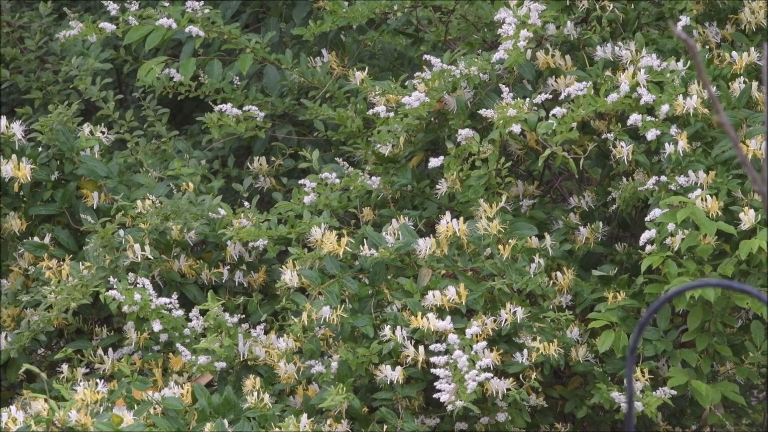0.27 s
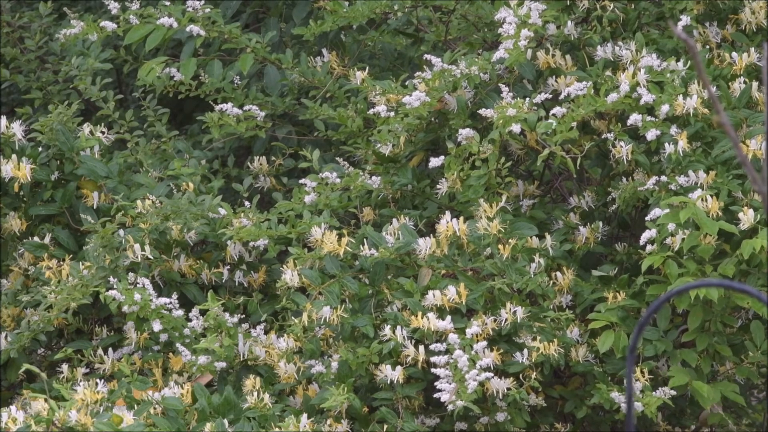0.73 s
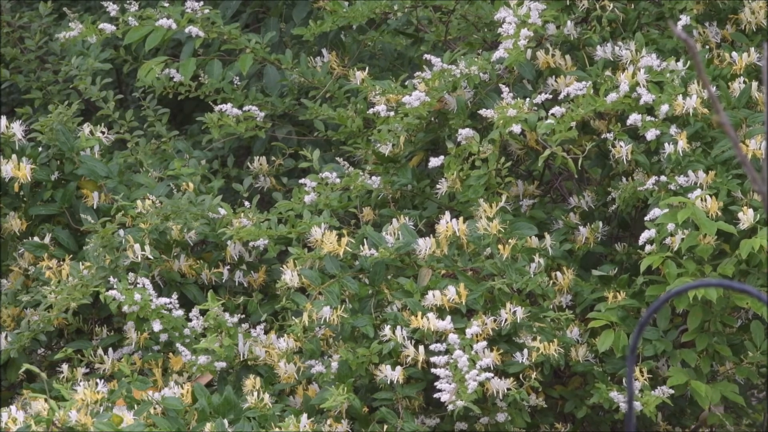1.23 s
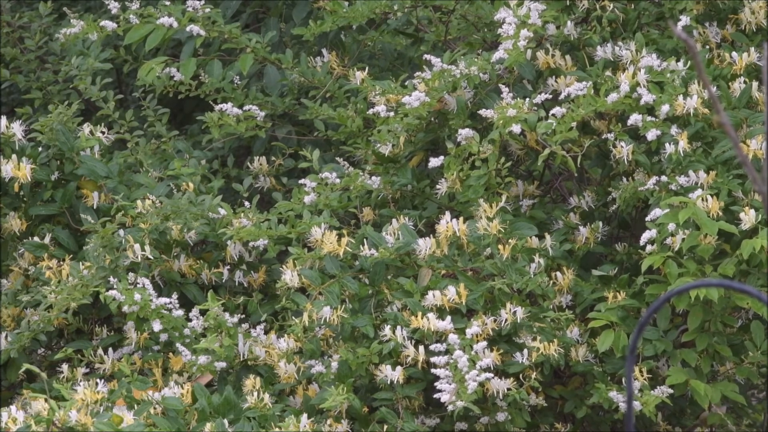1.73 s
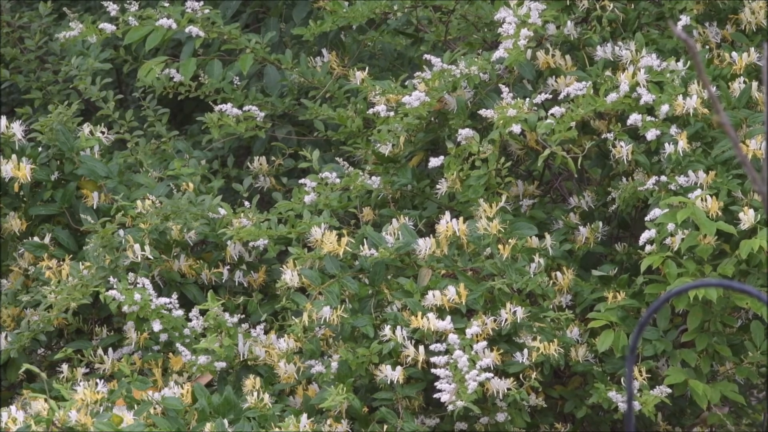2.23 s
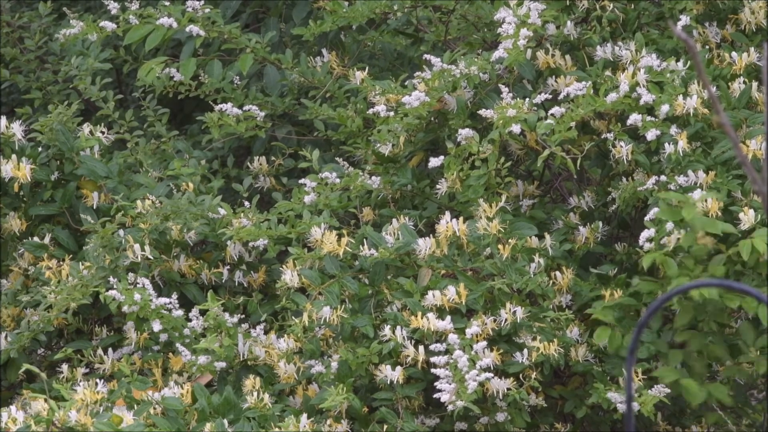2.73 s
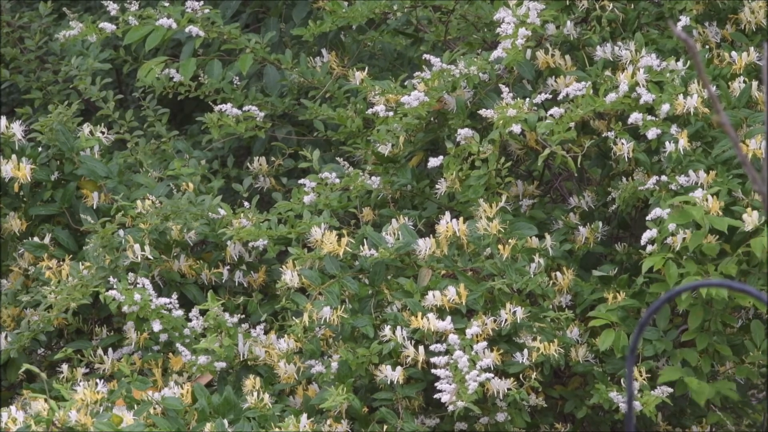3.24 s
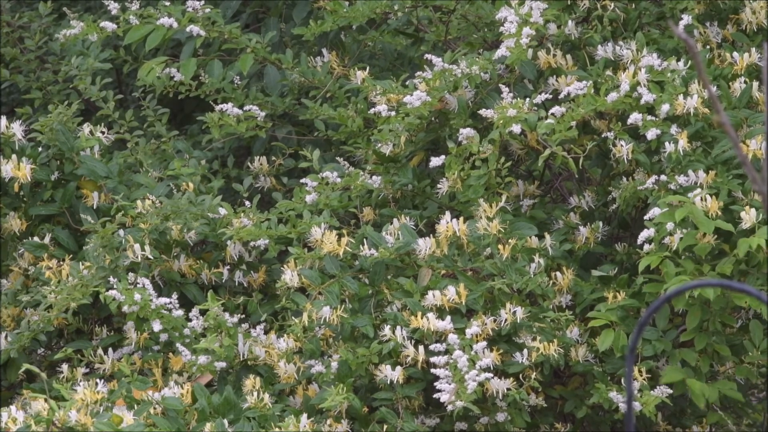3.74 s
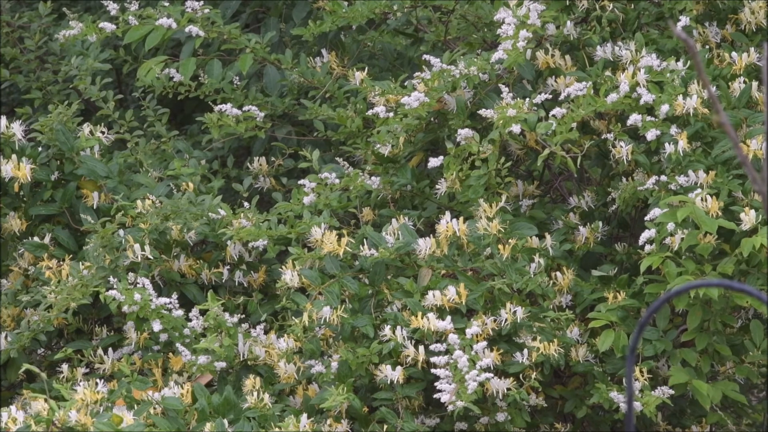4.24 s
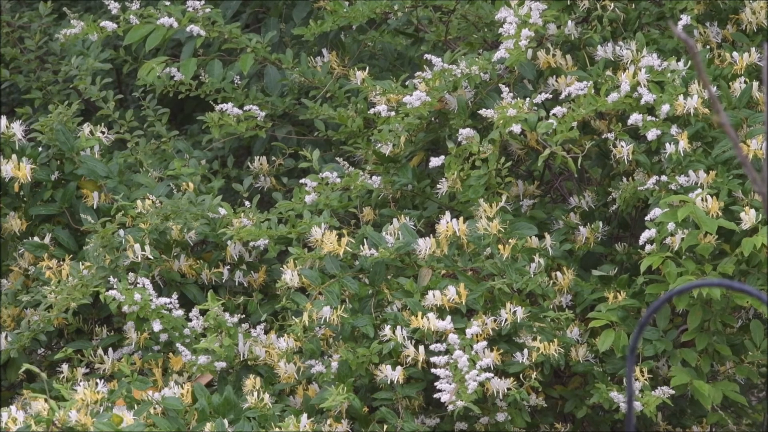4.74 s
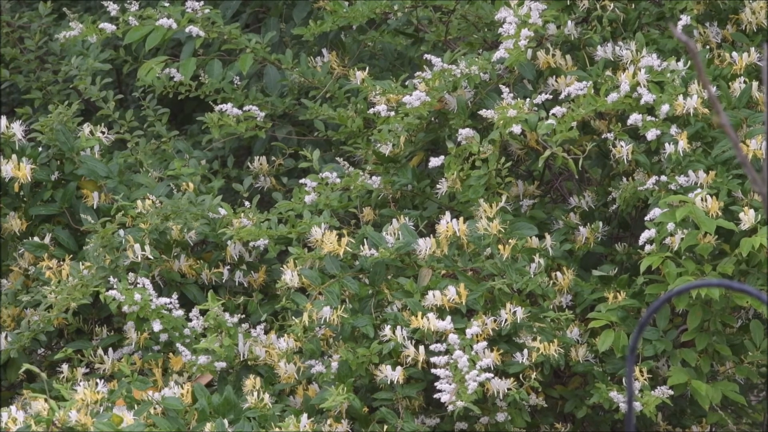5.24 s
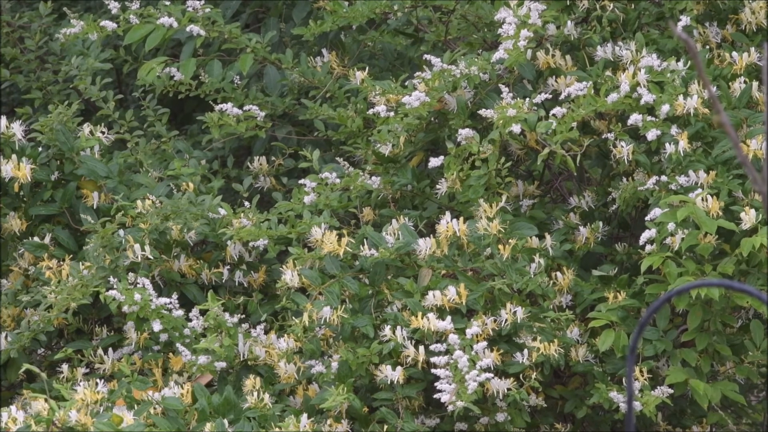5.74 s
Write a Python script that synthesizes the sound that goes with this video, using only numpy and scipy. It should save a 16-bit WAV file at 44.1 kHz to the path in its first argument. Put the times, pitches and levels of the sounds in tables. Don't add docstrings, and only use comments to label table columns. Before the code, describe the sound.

A rainy garden thicket, heard through a small stereo camera microphone. Steady rain hisses on leaves throughout, while near drops burst irregularly into crisp, bright splats on both sides, and others tap a hollow cover with short, dull, two-toned drum knocks and small watery rustles. At about 0.35 seconds a quail a few metres away gives one loud, almost pure whistle, sliding upward and ending by 0.5 with a quick higher break; it slightly overloads the microphone and echoes off a wall and bushes. Fine patter is strongest near 0.6 seconds. From about 1.7 a finch farther away begins faintly, then sings quick, high, sliding syllables in pairs, clearest between 2.2 and 3.9, softened by scattered echoes. It thins out after 4.3 and is nearly gone by 5.6. Distant traffic rumbles low beneath, surging briefly around 5.1 to 5.3. Rain and drops continue to the end at six seconds.

```python
import sys
import numpy as np
from scipy import signal
from scipy.fft import rfft, irfft
from scipy.io import wavfile
from scipy.ndimage import uniform_filter1d

SR = 44100
rng = np.random.default_rng(int(sys.argv[2]) if len(sys.argv) > 2 else 0)


def store_pcm(level_fs):
    pcm = np.round(np.clip(level_fs, -1, 1) * 32767).astype(np.int16)
    wavfile.write(sys.argv[1], SR, np.atleast_2d(pcm).T)


def gain_from_db(level_db):
    decades = np.asarray(level_db, float) / 20
    return 10 ** decades


N = 263701

# time in seconds, pitch in Hz, level in dB.
QUAIL_WHISTLE = [
    [(.355, 1254, -44), (.379, 1447, -35), (.386, 1610, -19.5), (.397, 1752, -10), (.403, 1763, -8.5),
     (.43, 1827, -3.5), (.447, 1840, -9.5), (.462, 1973, -9.5), (.48, 2257, -6), (.49, 2487, -8),
     (.497, 2670, -15)],
    [(.489, 3730, -28), (.494, 3565, -14.5), (.501, 3090, -17.5), (0.509, 2970, -6.5), (.515, 2900, -48)],
]
# start in seconds, pitch factor (a plain ratio), level in dB.
FINCH_SYLLABLES = [ ([(0, 6250, 0), (.012, 4470, 2.5), (.025, 4220, -11), (.04, 4370, -15)],
                   [(1.74, 0.97, -33.5)]), ([(0, 4700, -6), (.02, 5260, -4), (.065, 5310, -7),
                   (.08, 4950, -7), (.1, 4350, 1), (.115, 4200, -5), (.13, 4400, -23)],
                   [(1.885, 1.03, -29.5)]), ([(0, 3850, -4), (.025, 3470, -1), (.055, 3100, -5.5),
                   (.075, 3340, -21), (.09, 3470, -23)], [(2.122, 0.97, -29.5)]), ([(0, 6700, -11),
                   (.015, 6250, -2), (.035, 4550, 2), (.055, 4176, -8), (.07, 4830, -7), (.09, 5150, -5),
                   (.1, 5040, -21)], [(2.205, 1.001, -24)]), ([(0, 6266, -1), (.03, 5950, -1.5),
                   (.065, 5600, -7), (.085, 6240, -4), (.1, 6800, 2), (.115, 7400, -8), (.125, 7240, -14)],
                   [(2.37, 1, -24), (2.722, 0.99, -22.5)]), ([(0, 4700, -14), (.018, 5210, 6),
                   (.03, 4700, -4.5), (.05, 3906, -3.5), (.07, 3300, -17), (.09, 3700, -11.5),
                   (.115, 3910, -4.5), (.125, 3800, -26)], [(2.497, 0.99, -24), (2.852, 0.95, -26)]),
                   ([(0, 7400, -16), (.018, 6150, -5), (.03, 4800, 0.5), (.04, 3500, -19), (.06, 3200, -15),
                   (.07, 3930, 2.5), (.085, 4227, -2.5), (.15, 4270, -1.5), (.175, 4210, -12)],
                   [(3.115, 1, -23)]), ([(0, 7000, -24), (.018, 5890, -3), (.03, 4600, 1.5),
                   (.04, 3500, -8), (.06, 3200, -18), (.07, 3900, 2), (.09, 4150, -2), (.125, 4150, -15),
                   (.15, 4200, -14)], [(3.38, 1.001, -23.5)]), ([(0, 2600, -7), (.02, 2840, -3.5),
                   (.035, 3200, -11)], [(4.072, .95, -33.5), (4.26, 1.03, -33)]), ([(0, 3790, -12),
                   (.012, 5250, -2), (.03, 6210, -6.5), (.06, 6300, -9), (.068, 5330, 0),
                   (.078, 4500, -7.5), (.09, 4700, -24)], [(3.633, 1.025, -21), (3.787, 1.03, -21.5)]),
                   ([(0, 4500, 2), (.01, 3890, 1.5), (.025, 3105, -3.5), (.038, 3840, -20),
                   (.048, 4850, 0.5), (.085, 4990, -9.5), (.1, 4950, -24)], [(3.942, 0.99, -26.5),
                   (4.128, 1, -26.5)]), ([(0, 7100, 5), (.015, 6500, -1), (.04, 6300, -5),
                   (.05, 6300, -16)], [(4.357, 0.93, -39), (4.58, 0.99, -34), (4.787, 0.97, -37)]),
                   ([(0, 4100, -13), (.025, 5000, 3.5), (.04, 5800, -0.5), (.047, 4200, 0.5),
                   (.065, 3100, -5), (.09, 3600, -14), (.11, 4160, -5.5), (.125, 4370, -18)],
                   [(4.385, 1.001, -29), (4.61, 1, -29), (4.813, 1.02, -31.5)]), ([(0, 7400, 5),
                   (.025, 7330, 0), (.06, 7250, -7), (.08, 7220, 2)], [(5.035, 1.002, -31.5),
                   (5.575, 1.001, -47)]), ([(0, 4510, -2), (.015, 3900, -0.5), (.035, 3200, -14),
                   (.05, 3600, -13)], [(5.065, 0.9, -33), (5.2, 0.99, -32), (5.47, 1.001, -38)]),
                   ([(0, 3800, -14), (.04, 4600, -7), (.075, 4300, 0), (.1, 3360, 0), (.12, 3200, -16)],
                   [(.005, 1.001, -41)]), ([(0, 7670, 1), (.1, 7420, -5), (.2, 7150, 0), (.3, 6750, -3)],
                   [(1.03, 0.91, -42)]), ]
# start in seconds, peak in dB, dull body against the fizz in dB.
LEAF_DROPS = [(0.0533, -19.5, -26), (0.204, -15, -24), (0.2345, -10, -37), (0.3272, -13, -21),
              (0.3621, -36, -18), (0.4417, -5.5, -17.5), (0.508, -6.5, -16.5), (0.529, -8, -16),
              (0.557, -10, -15), (0.5793, -6, -19.5), (0.6494, -7, -22), (0.7422, -13, -20),
              (0.779, -10.5, -10), (0.9226, -22, -14), (0.9438, -8, -21), (1.0895, -5, -18),
              (1.1568, -12.5, -30), (1.1911, -11, -33), (1.274, -13, -21), (1.3126, -8, -19),
              (1.4626, -14.5, -20), (1.5635, -0.5, -25.5), (1.6736, -18, -13), (1.7128, -8.5, -18),
              (1.7575, -16.5, -18), (1.7883, -9, -26), (1.8142, -9, -16.5), (1.8901, -20, -20),
              (1.9226, -3.5, -28), (2.0597, -16.5, -24), (2.1425, -14, -19.5), (2.2144, -18, -22),
              (2.277, -13, -20), (2.3281, -24, -20), (2.3468, -26, -25), (2.382, -24, -22),
              (2.4743, -30, -20), (2.6003, -12, -20), (2.6867, -14, -21), (2.7207, -18.5, -20),
              (2.7555, -14, -26), (2.8828, -16, -16), (2.9243, -7.5, -21), (3.0345, -19, -20),
              (3.0845, -21, -25), (3.1204, -7.5, -18.5), (3.2326, -16, -23), (3.275, -6, -23),
              (3.316, -4, -31), (3.3657, -11, -26), (3.403, -6, -17), (3.5054, -14.5, -20),
              (3.75, -7, -21.5), (3.8774, -6, -27), (3.9467, -9.5, -23), (4.0113, -10.5, -23),
              (4.0961, -14, -15), (4.1744, -16.5, -18), (4.2183, -13, -22), (4.2663, -24, -23),
              (4.2876, -12.5, -30), (4.3585, -15, -19.5), (4.472, -13, -23), (4.558, -16, -20),
              (4.579, -16, -18), (4.6239, -21, -20), (4.6558, -11.5, -19), (4.694, -9, -20),
              (4.7174, -6.5, -14.5), (4.781, -10.5, -19.5), (4.8115, -20, -22), (4.8738, -19, -24),
              (4.9402, -11.5, -23), (4.998, -13, -16), (5.063, -12, -20), (5.0698, -4.5, -22),
              (5.1322, -16, -24), (5.2083, -11.5, -20.5), (5.3652, -15, -13), (5.4124, -13, -16),
              (5.42, -9.5, -22), (5.474, -10, -16), (5.5257, -9.5, -26), (5.5777, -35, -23),
              (5.6935, -14.5, -24), (5.7224, -33, -20), (5.7703, -22, -18), (5.7885, -8.5, -27),
              (5.9174, -15, -16), (5.9618, -28, -17)]
# start in seconds, peak in dB, upper tone against lower in dB,
# lower tone in Hz, upper tone in Hz.
COVER_DROPS = [(0.174, -24, 2, 324, 791), (0.26, -27, -3, 410, 721), (0.42, -20, 9, 312, 763),
               (0.528, -25.5, -3, 296, 764), (0.553, -22, 4, 340, 703), (0.742, -18.5, 0, 340, 714),
               (0.788, -19, 15, 304, 795), (1.055, -22, 12, 326, 570), (1.402, -24, 0, 427, 735),
               (1.567, -20, 10, 290, 722), (1.653, -19, 6, 278, 719), (1.815, -25, 3, 290, 725),
               (1.92, -28, 9, 343, 620), (1.939, -22.5, 2, 336, 773), (2.212, -20, -7, 352, 724),
               (2.284, -24, 0, 403, 657), (2.378, -26, 6, 404, 590), (2.63, -21, 2, 384, 750),
               (2.719, -18, 10, 273, 734), (2.823, -18.5, 2, 280, 711), (3.033, -19.5, -5, 324, 724),
               (3.272, -23.5, 3, 297, 760), (3.336, -23, 3, 424, 770), (3.376, -23.5, 3, 255, 705),
               (3.496, -25.5, 9, 423, 797), (3.662, -23, 2, 420, 616), (3.897, -17, 10, 280, 728),
               (3.956, -19.5, 0, 283, 715), (4.1, -29, 3, 344, 603), (4.173, -23, 3, 357, 716),
               (4.357, -23.5, 0, 323, 611), (4.654, -23, 1, 345, 770), (4.705, -26, 1, 340, 770),
               (4.998, -18, 6, 287, 712), (5.06, -18, 12, 350, 694), (5.364, -20, 4, 340, 719),
               (5.41, -19.5, 5, 306, 760), (5.5, -27, 1, 427, 584), (5.69, -23, -5, 342, 705),
               (5.722, -26, 1, 290, 720)]
# frequency in Hz, density in dB per Hz.
RAIN_COLOUR = [(53, -24), (90, -12), (124, -8), (221, -14.5), (311, -11.5), (510, -11.5), (718, -11.5),
               (990, -12.5), (1310, -9.5), (2650, -13), (3730, -11.5), (4620, -15.5), (12100, -20),
               (15000, -13)]
# time in seconds, level in dB.
PATTER_LEVEL = [
    (0.0, -45),
    (0.6, -27),
    (0.78, -36),
    (3.43, -34),
    (3.61, -30.5),
    (4.36, -47),
    (4.66, -34),
    (5.46, -43),
    (5.98, -31),
]
# time in seconds, level in dB.
RUMBLE_LEVEL = [
    (0.0, -24),
    (0.05, -35.5),
    (2.58, -34),
    (3.41, -31.5),
    (5.01, -31.5),
    (5.09, -20.5),
    (5.4, -33),
    (5.9, -32),
    (5.98, -34),
]
# start in seconds, length in seconds, level in dB.
WATER_HEAPS = [
    (0.523, 0.088, -32),
    (1.054, .08, -33.5),
    (1.39, .08, -39),
    (3.331, 0.12, -37.5),
    (4.64, .1, -39.5),
    (5.053, 0.15, -37),
    (5.353, .06, -45),
    (5.86, 0.11, -36),
]
WALL_S = 0.0406


def level(x, db):
    return x * gain_from_db(db) / np.sqrt(np.mean(x ** 2))


def band(x, lo_hz, hi_hz, order=2):
    edges_hz = [lo_hz, min(hi_hz, .47 * SR)]
    return signal.sosfilt(signal.butter(order, edges_hz, "bandpass", fs=SR, output="sos"), x)


def walk(rate, size=N):
    hold = max(int(SR / rate), 1)
    values = rng.standard_normal(size // 8 + 1)[:size // hold + 1]
    steps = np.repeat(values, hold)
    smooth = uniform_filter1d(uniform_filter1d(steps, hold), hold)
    return 1.58 * smooth[:size]


def curve(table):
    return np.interp(np.arange(N) / SR, *np.transpose(table))


def add(out, x, s):
    i = max(int(s * SR), 0)
    out[..., i:i + x.shape[-1]] += x[..., :N - i]


def fizz(spray, low_db):
    return band(spray, 12830, 19500, order=1) + gain_from_db(low_db) * band(spray, 7510, 16900)


def whistle(rows, second_db):
    s, hz, db = np.transpose(rows)
    t = np.arange(s[0], s[-1], 1 / SR)
    pitch = uniform_filter1d(np.interp(t, s, hz), size=90)
    phase = 2 * np.pi * np.cumsum(pitch) / SR
    fade = np.clip(np.minimum(t - s[0], s[-1] - t) / 0.001, 0, 1)
    tone = np.sin(phase) + gain_from_db(second_db) * np.sin(2 * phase)
    return np.sqrt(2) * fade * gain_from_db(np.interp(t, s, db)) * tone


def thicket(x, pan_db, lag, near_db, wall_db, smear_db, smear_t60, tail_db, t60, alike, leaf_hz):
    t = np.arange(SR // 2) / SR
    leaves = gain_from_db(near_db - 60 * t / 0.1) * (t > .002)
    smear = gain_from_db(smear_db - 60 * np.abs(t - WALL_S) / smear_t60)
    tail = gain_from_db(tail_db - 60 * t / t60) * (t > .01)
    mid, side = rng.standard_normal((2, len(t)))
    shape = (leaves + smear + tail) * gain_from_db(4.3 * walk(350, size=len(t)))
    scatter = np.sqrt(alike) * mid + np.sqrt(1 - alike) * side * np.array([[1], [-1]])
    response = band(shape * scatter, leaf_hz, 8900, order=1)
    response += gain_from_db(wall_db) * np.sinc((t - WALL_S) * SR)
    response[0, 0], response[1, lag] = gain_from_db(pan_db / 2), gain_from_db(-pan_db / 2)
    return signal.fftconvolve(x[None], response, axes=1)[:, :N]


def rumble():
    mid, side, low = rng.standard_normal((3, N))
    note = level(band(mid, 52.4, 69), -2.0) + level(band(low, 18.6, 105.4), -7.5)
    side = level(band(side, 25, 160), -17.5)
    return np.array([note + side, note - side]) * gain_from_db(curve(RUMBLE_LEVEL))


def rain():
    f = np.maximum(np.arange(N // 2 + 1) * SR / N, 1)
    hz, db = np.transpose(RAIN_COLOUR)
    colour = gain_from_db(np.interp(np.log(f), np.log(hz), db))
    mid, side = rfft(rng.standard_normal((2, N))) * colour
    side = side * np.clip(f / 2900.0, .08, 1) ** 0.37
    out, swell = 0, walk(3.124)
    for k in np.arange(18, 43, 2):
        share = np.clip(1 - np.abs(3 * np.log2(f) - k) / 2, 0, 1) ** .5
        m, d = irfft([mid * share, side * share], N)
        out = out + gain_from_db(.7 * swell + 1.4 * walk(22)) * np.array([m + d, m - d])
    return level(out, -30.5)


def patter():
    chance = rng.random((2, N))
    clicks = (chance[0] < 120. / SR) * gain_from_db(-4.5 * np.log(chance[1]))
    fade_s = 0.0067
    spray = signal.lfilter([1], [1, -np.exp(-1 / (fade_s * SR))], clicks) + 0.25
    noise = rng.standard_normal((3, N))
    noise = (0.1 * noise[0] + 2.8 * noise[1:]) * spray
    drops = fizz(noise, low_db=5.0) + gain_from_db(-17) * band(noise, 900, 7000, order=1)
    return level(drops, -1.8) * gain_from_db(curve(PATTER_LEVEL))


def drums():
    out, rustle, t = np.zeros(N), np.zeros(N), np.arange(SR // 8) / SR
    ring = gain_from_db(-60 * t / 0.068)
    faint = rng.random((70, 5)) * [N / SR, 9, 12, 240, 500] + [0, -34, -7.5, 241, 490]
    for s, db, upper_db, hz, upper_hz in [*COVER_DROPS, *faint]:
        ragged, wet = rng.standard_normal((2, len(t)))
        push = (1 + 2.4 * ragged[:400]) * np.exp(-t[:400] / 0.0011)
        modes = ring * (np.sin(2 * np.pi * hz * t) + gain_from_db(upper_db) * np.sin(2 * np.pi * upper_hz * t))
        hit = signal.fftconvolve(push, modes)[:len(t)]
        add(out, gain_from_db(db) * hit / np.abs(hit).max(), s - .002)
        add(rustle, gain_from_db(db + 1 - 60 * t / 0.1) * wet, s)
    for s, length, db in WATER_HEAPS:
        heap = rng.standard_normal(len(t)) * gain_from_db(5.0 * walk(90, size=len(t)))
        fade = np.clip(t / 0.0051, 0, 1) * np.clip((length - t) / 0.019, 0, 1)
        add(rustle, level(heap, db + 15) * fade, s)
    out = out + band(rustle, 220, 1440, order=1)
    side = gain_from_db(-13.5) * band(np.roll(out, 260), 200, 2000)
    return out + np.array([side, -side])


def splats():
    bright, body, t = np.zeros((2, N)), np.zeros((2, N)), np.arange(SR // 8) / SR
    landing = 0.093 * np.exp(-((t - .014) / 0.0025) ** 2)
    burst = gain_from_db(-60 * t / 0.019) + 0.54 * gain_from_db(-60 * t / .1) + landing
    burst = burst * np.clip(t / 0.0014, 0, 1)
    for s, db, body_db in LEAF_DROPS:
        noise = rng.standard_normal((3, len(t)))
        pan_db = 3.4 * noise[0, 0]
        grains = gain_from_db(3.0 * walk(580, size=len(t)))
        spray = (0.39 * noise[0] + 2.3 * noise[1:]) * grains * burst
        side_db = np.array([[pan_db], [-pan_db]]) / 2
        spray = spray / np.abs(spray).max() * gain_from_db(db + 3 + side_db)
        add(bright, spray, s)
        add(body, gain_from_db(body_db + 14) * spray, s)
    dull = band(body, 3560, 9200) + gain_from_db(-5.5) * band(body, 1100, 5300, order=1)
    return fizz(bright, low_db=-3) + dull


def finch():
    voice = np.zeros(N)
    for shape, uses in FINCH_SYLLABLES:
        for s, factor, db in uses:
            syllable = whistle(np.multiply(shape, [1, factor, 1]), second_db=-45)
            add(voice, gain_from_db(db - 1.0) * syllable, s)
    return thicket(voice, pan_db=3.5, lag=1, near_db=-24, wall_db=-20, smear_db=-31.5, smear_t60=0.055,
                   tail_db=-31.5, t60=0.43, alike=0.49, leaf_hz=2010)


def quail():
    voice = np.zeros(N)
    for part in QUAIL_WHISTLE:
        add(voice, whistle(part, second_db=-34), part[0][0])
    return thicket(voice, pan_db=4.2, lag=0, near_db=-26, wall_db=-8, smear_db=-31.5, smear_t60=0.085,
                   tail_db=-36, t60=0.59, alike=0.62, leaf_hz=3200)


def scene():
    return quail() + finch() + splats() + drums() + rain() + patter() + rumble()


def roll_off(x):
    return signal.sosfilt(signal.butter(12, 16610, fs=SR, output="sos"), x)


def record(dry):
    wet = np.array([dry[0], np.roll(dry[1], 2)])
    port_hz, port_width_hz, port_db = 14640, 1000, -1.5
    peak = signal.iirpeak(port_hz, port_hz / port_width_hz, fs=SR)
    wet = wet + gain_from_db(port_db) * signal.lfilter(*peak, wet)
    wet = signal.sosfilt(signal.ellip(8, .2, 50, 16200, fs=SR, output="sos"), wet)
    return roll_off(np.clip(wet, -1, 1))


dry = scene()
out = record(dry)
store_pcm(out)
```